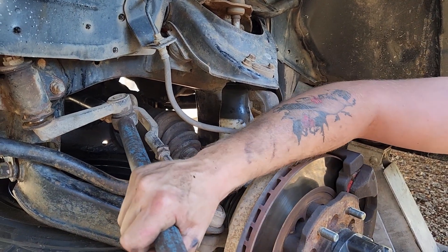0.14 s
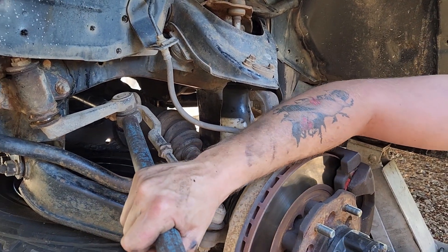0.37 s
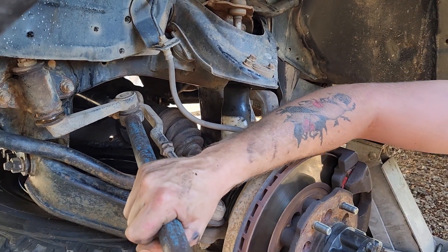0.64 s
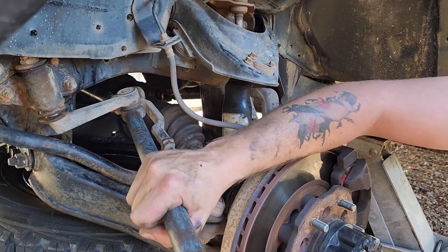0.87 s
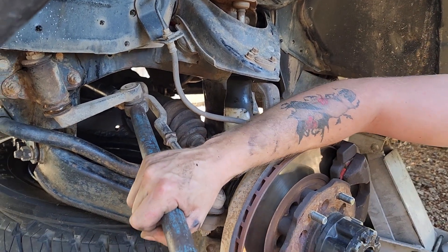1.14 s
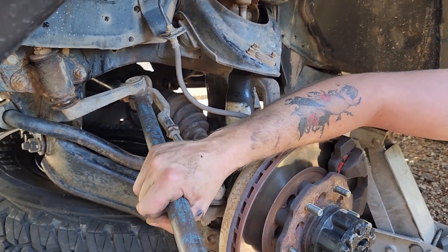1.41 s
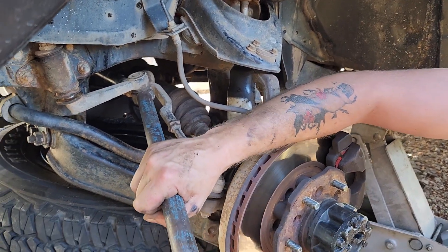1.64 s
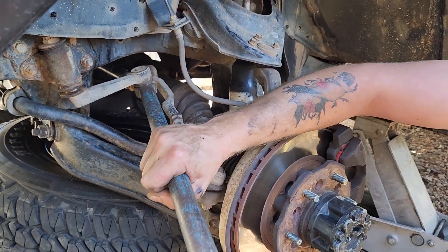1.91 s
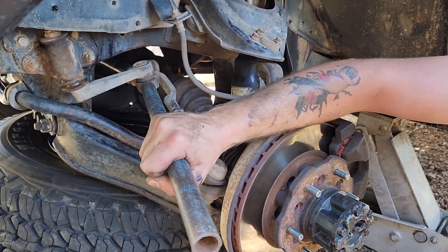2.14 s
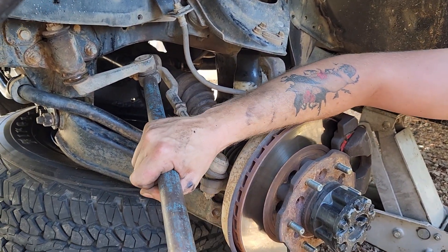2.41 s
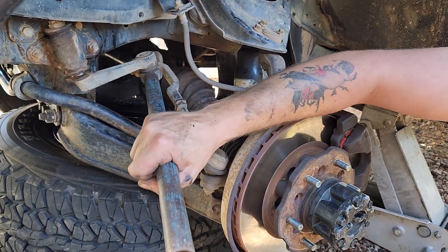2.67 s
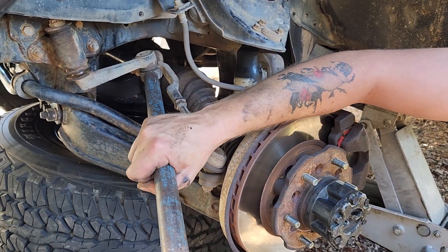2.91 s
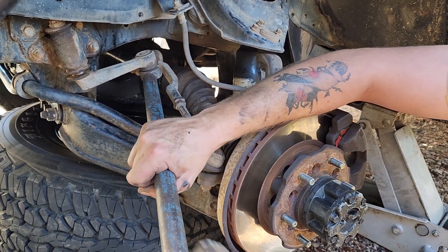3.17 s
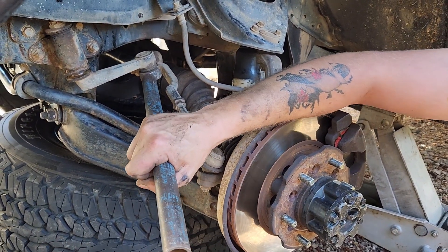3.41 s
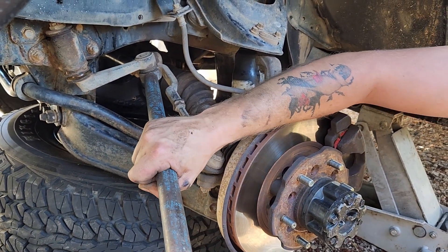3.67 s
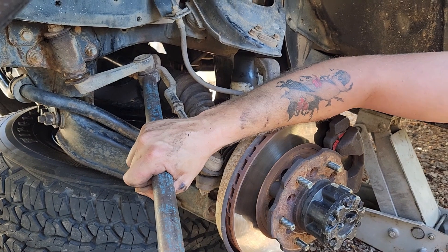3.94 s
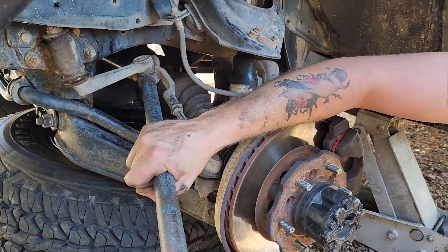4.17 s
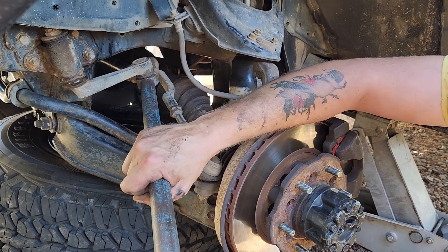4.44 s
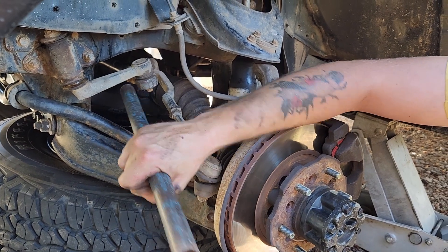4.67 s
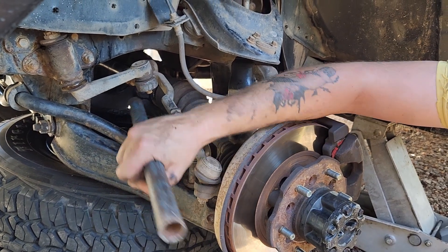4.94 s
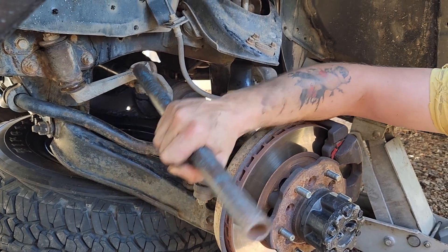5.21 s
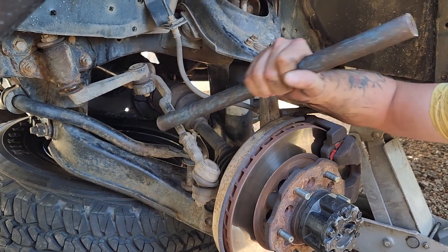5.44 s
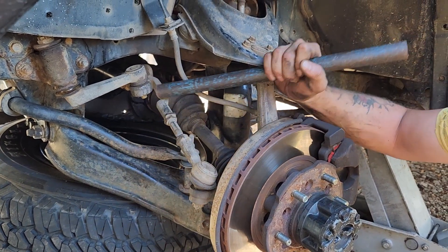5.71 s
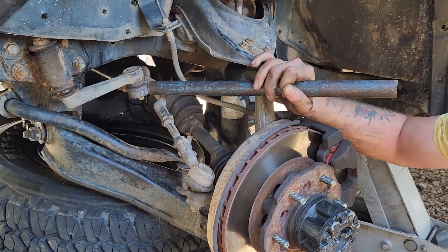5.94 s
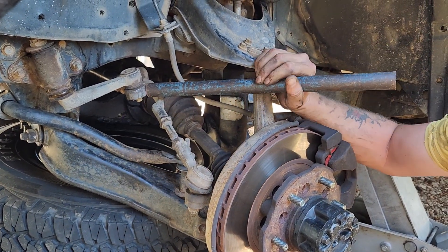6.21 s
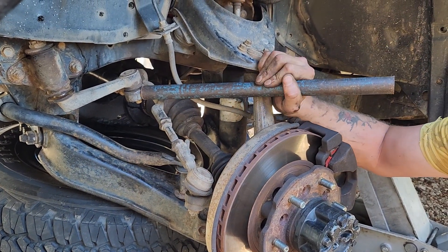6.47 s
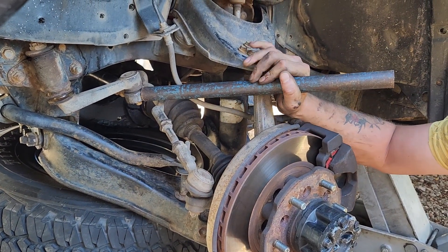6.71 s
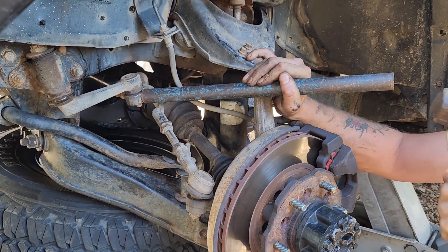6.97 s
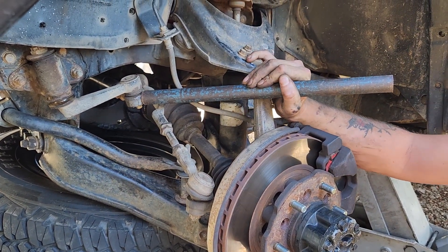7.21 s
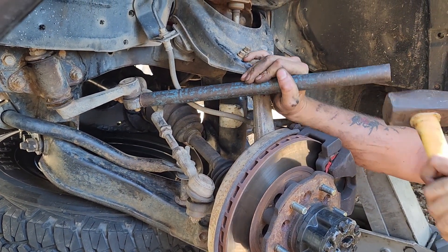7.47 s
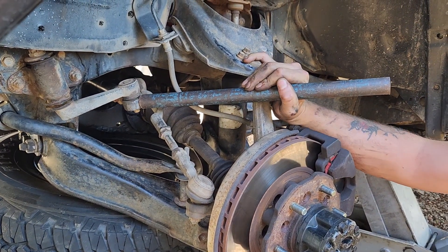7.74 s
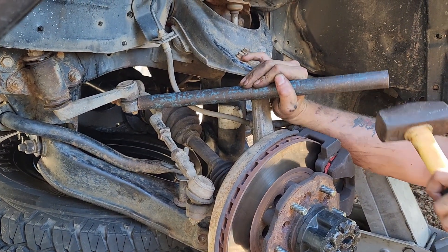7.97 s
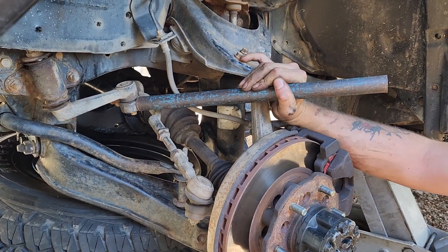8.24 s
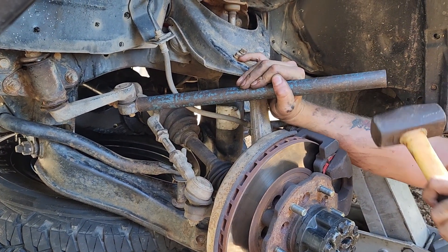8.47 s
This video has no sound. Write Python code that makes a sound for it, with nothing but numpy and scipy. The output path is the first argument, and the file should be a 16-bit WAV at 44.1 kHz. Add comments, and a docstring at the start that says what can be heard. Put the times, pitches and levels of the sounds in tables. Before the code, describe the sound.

A sledge hammer strikes a hand-held steel bar against a vehicle joint: three blows about half a second apart, a pause, five more, then a longer gap where the loose bar clinks and scrapes into place, and three final blows. Each is a short, damped clank with rattling bodywork and low boom. Close stereo microphone, slightly overloaded, outdoors with faint rumble and hiss.

```python
"""Far rumble, murmur and hiss fill the air; then a sledge hammer drives a hand-held steel bar against a vehicle's joint.
Each blow rings bar, hammer head and frame as dying modes, clatters through the bodywork as shaped noise
and leaves a low boom; soft limiting rounds off the loudest.
Between the runs the loose bar taps the joint with duller rings, dry noise bursts snap and grainy noise rubs like cloth."""
import sys
import numpy as np
from scipy import signal
from scipy.io import wavfile
from scipy.ndimage import uniform_filter1d, map_coordinates

SR = 44100
rng = np.random.default_rng(int(sys.argv[2]) if len(sys.argv) > 2 else 0)


def wav_out(sig):
    """Save sig, one row per channel (or a flat mono array), as 16-bit PCM at SR to the path in sys.argv[1]."""
    wavfile.write(sys.argv[1], SR, np.round(np.clip(np.atleast_2d(sig).T, -1, 1) * 32767).astype(np.int16))


def invert_db(x):
    """Field ratio 10**(x/20) for x, a level in decibels (scalar or array-like)."""
    u = np.asarray(x, float) / 20
    return 10 ** u


N = 379701

# hammer blows: [t/s, level/dB, thud/dB, brightness/dB, lower frame ring/dB, upper frame ring/dB], all relative levels
BLOW_EVENTS = [(0.536, -8, -5, 1, -16.5, 17), (1.026, -10, -4.5, 0, 1.5, 4),
               (1.525, -10, 3, -2.5, -4, -1.5), (2.764, -9.5, 1.5, 1.5, -4, 3),
               (3.263, -10, 1.5, -3.5, -9, -2), (3.816, -13, 2, 5, -15, -5),
               (4.294, -10.5, -2.5, 0, -1.5, -1.5), (4.786, -10, 3, -1, 2.5, -0.5),
               (7.604, -9.5, 3, 1, -4.5, 2.5), (8.093, -9, 2, -0.5, -0.5, 4), (8.591, -7, -1, 0, 15, 8.5)]
# pitches of the steel bar's modes: [f/Hz]
BAR_PITCHES = [400, 711, 802, 828, 856, 936, 1240, 1262, 1340, 1523, 1664, 1735, 1870, 2168, 2450, 3000,
               3550, 4090, 4170, 4300, 4720, 5755, 6400, 7400]
# the bar damped by the hand, one row a pitch: [level/dB before family offsets, t60/s in the firm grip]
BAR_RINGS = [(-10.5, 0.17), (-11, .1), (-9, .1), (3, 0.14), (-2.5, 0.17), (-4.5, 0.21), (-8.5, 0.06),
             (-1, 0.22), (2, 0.09), (-6.5, 0.07), (-1, 0.14), (-1, 0.087), (-4.5, 0.085), (0, 0.11),
             (-12, 0.06), (-14, .08), (-9, 0.031), (-5, .075), (-7, .055), (-4, .06), (-15, 0.054),
             (-15.5, 0.031), (-10, 0.18), (-16, 0.13)]
# centres of the bar's mode families: [f/Hz]
BAR_FAMILIES = [840, 1300, 1700, 2170, 4100, 4300, 5700]
# which bar families make the ping: [0 or 1]
PING_FAMILIES = np.array([0, 0, 0, 0, 1, 1, 0])
# pitches of the vehicle frame and axle: [f/Hz]
FRAME_PITCHES = [90, 119, 152, 200, 223, 268, 279, 296, 418, 434, 462, 479, 549, 617, 630, 640, 848, 1231,
                 1769, 2068]
# frame and axle, one row a pitch: [level/dB before family offsets, t60/s, rise/s]
FRAME_RINGS = [(-27, 1.2, .04), (-24, .7, .05), (-32, .9, .04), (-35, .7, .03), (-35, .8, .03),
               (-19, .6, .07), (-16, .5, .09), (-26, .2, .01), (-35, .7, .02), (-38, .6, .02),
               (-36, 1.1, .08), (-39, .8, .02), (-40, 1.1, .02), (-43, 1.2, .02), (-44, 1.2, .02),
               (-45, 1.2, .02), (-52, .9, .02), (-56, 1.4, .02), (-54, 2.2, .02), (-52, .75, .02)]
# centres of the frame's mode families: [f/Hz]
FRAME_FAMILIES = [110, 275, 463, 549, 625, 1769, 2068]
# stereo lean of sounds from the bar: [f/Hz, left minus right/dB]
STEREO_LEAN = [(60, -1), (240, -0.5), (950, -1.5), (3770, -4), (9500, -0.5), (15000, 3.5)]
# spectrum of the low rumble: [f/Hz, relative level/dB per Hz]
RUMBLE_SPECTRUM = [(12, -38.5), (20, -11), (65, 4), (124, -5.5), (155, -6.5), (242, -24.5), (274, -14),
                   (300, -23.5), (390, -56), (660, -120)]
# spectrum of the mid murmur: [f/Hz, relative level/dB per Hz]
MURMUR_SPECTRUM = [(88, -27), (150, 2.5), (371, -6), (498, -16.5), (616, -14.5), (646, -13.5), (1010, -21),
                   (2500, -36), (3250, -70), (5500, -120)]


def unit(x):
    """Scaled to rms 1."""
    return x / np.sqrt(np.mean(x ** 2) + 1e-20)


def along(points, hz):
    """Every column after the first, read on a log frequency axis."""
    f, *cols = np.transpose(points)
    return np.array([np.interp(np.log(hz + 1), np.log(f + 1), c) for c in cols])


def curves(rows):
    """One value per sample for each column after the time."""
    s, *cols = np.transpose(rows)
    return [np.interp(np.arange(N) / SR, s, c) for c in cols]


def wobble(rate):
    """A smooth random curve, rate knots a second."""
    knots = rng.standard_normal(int(N * rate / SR) + 4)
    return map_coordinates(knots, [np.arange(N) * rate / SR])


def add(mix, s, sound):
    """Lays a stereo sound into the mix at s seconds."""
    start = round(s * SR)
    mix[:, start:start + sound.shape[1]] += sound


def rush(spectrum, patchy_db):
    """Stereo noise of rms 1, patchy in time and pitch, its channels less alike towards the treble."""
    # left-right likeness: [f/Hz, correlation 0-1]
    likeness = [(40, .9), (130, .85), (300, .6), (700, .5), (1500, .25), (3000, .05)]
    hz, _, z = signal.stft(rng.standard_normal((2, N)), SR, nperseg=2048)
    field = uniform_filter1d(rng.standard_normal(z.shape[1:]), size=12, axis=0)
    field = uniform_filter1d(field, size=3, axis=1)
    turn = np.arccos(np.clip(along(likeness, hz)[0], -1, 1))[:, None] / 2
    mid, side = z * invert_db(along(spectrum, hz).T + patchy_db * unit(field))
    left = np.cos(turn) * mid + np.sin(turn) * side
    right = np.cos(turn) * mid - np.sin(turn) * side
    return unit(signal.istft(np.array([left, right]), SR, nperseg=2048)[1][:, :N])


def air():
    """Far rumble that swells in lumps, a mid murmur with thin tones, and hiss."""
    # background over time: [t/s, rumble/dB, murmur/dB, hiss/dB, tone offset/dB]
    bed_levels = [(0.0, -45.5, -55.5, -71.5, -1), (0.33, -46.5, -57, -73.5, 1),
                  (1.25, -53.5, -51.5, -73, 2.5), (2.61, -48.5, -65.5, -82.5, -5),
                  (3.04, -50, -55.5, -73.5, -6.5), (4.1, -50, -57, -78, -2.5), (4.91, -48, -55, -77.5, 0),
                  (5.42, -50, -63.5, -83, -7), (7.6, -45.5, -56.5, -68.5, 4.5), (7.82, -48, -53, -75, 3.5),
                  (8.61, -51.5, -57.5, -78, -2)]
    # spectrum of the hiss: [f/Hz, relative level/dB per Hz]
    hiss_spectrum = [(880, -23.5), (1500, -3.5), (1740, -2), (2160, -3), (4120, -3.5), (5490, -4),
                     (6180, -8.5), (8240, -5.5), (16000, -24.5)]
    # thin far tones: [f/Hz, rms level/dB before the tone offset]
    thin_tones = [(608.3, -74), (990.5, -80.5)]
    rumble_db, murmur_db, hiss_db, tones_db = curves(bed_levels)
    rumble = invert_db(rumble_db + 1.6 * wobble(4.1)) * rush(RUMBLE_SPECTRUM, patchy_db=1.5)
    murmur = invert_db(murmur_db) * rush(MURMUR_SPECTRUM, patchy_db=1.3)
    hiss = invert_db(hiss_db) * rush(hiss_spectrum, patchy_db=1.2)
    tones = np.zeros(N)
    for hz, db in thin_tones:
        sine = np.sqrt(2) * np.sin(2 * np.pi * hz * np.arange(N) / SR)
        tones += invert_db(db + tones_db + 0.5 * wobble(6.5)) * sine
    return rumble + murmur + tones + hiss


def ring(hz, db, t60, rise, scatter_db, apart, length, waver):
    """Dying modes at scattered strengths, up to apart seconds (at most a cycle) out of step between the channels.
    Rubbing contact makes phase (waver rad each 10 ms) and size wander."""
    t = np.arange(round(length * SR)) / SR
    size = invert_db(db + scatter_db * rng.standard_normal(len(hz)))
    step, swell = waver * rng.standard_normal((2, len(hz), 120))
    # real part: log size; imaginary part: phase, starting at zero
    knots = .5 * swell + 1j * (np.cumsum(step, axis=1) - step[:, :1])
    drift = np.array([np.interp(t, np.arange(len(k)) / 100, k) for k in knots])
    decay = np.outer(2j * np.pi * hz - np.log(1000) / t60, t)
    wave = np.exp((decay + drift).astype(np.complex64))
    wave *= 1 - np.exp(-t / np.reshape(rise, (-1, 1)))
    lead = np.clip(2 * np.pi * hz * apart, 0, 2 * np.pi) * rng.uniform(-.5, .5, len(hz))
    lean_db = along(STEREO_LEAN, hz)[0] / 2
    channels = []
    for ear in (1, -1):  # left, right
        weight = size * invert_db(ear * lean_db) * np.exp(1j * ear * lead)
        channels.append((weight @ wave).imag)
    return np.array(channels)


def clatter(low_db, high_db, stretch, alike_hz, length):
    """A crack, then noise that drops fast and trails off in the bodywork's hollows; channels agree below alike_hz."""
    # spectrum of the loose parts: [f/Hz, relative level/dB per Hz]
    parts_spectrum = [(59, -46.5), (100, -18.5), (847, -12.5), (1070, -15), (1300, -8.5), (2310, -14),
                      (4120, -12.5), (7020, -22), (9880, -15), (15100, -23), (16500, -42)]
    # how the clatter dies: [f/Hz, first t60/s before stretch, tail t60/s, tail level/dB]
    die_away = [(99, 0.4, .9, 1), (300, 0.3, 0.26, -2.5), (800, 0.13, 0.29, -4.5), (1900, 0.17, .4, -16.5),
                (3280, 0.14, 0.31, -19), (5600, 0.09, 0.34, -21), (12000, 0.062, 0.34, -27.5)]
    hz, t, z = signal.stft(rng.standard_normal((3, round(length * SR))), SR, nperseg=256)
    share = 1 / (1 + (hz[:, None] / alike_hz) ** 2)
    z = np.sqrt(share) * z[0] + np.sqrt(1 - share) * z[1:]
    first, tail, tail_db = along(die_away, hz)[..., None]
    swell = 1 - np.exp(-t * hz[:, None] / 12)  # the tail swells in over about a dozen cycles, so the lows bloom late
    crack = invert_db(6 - 60 * t / .025)  # t60 25 ms
    fade = crack + invert_db(-60 * t / (first * stretch)) + invert_db(tail_db - 60 * t / tail) * swell
    tilt_db = along([(700, low_db), (1800, 0), (5000, high_db)], hz).T
    lean_db = np.array([[[.5]], [[-.5]]]) * along(STEREO_LEAN, hz).T
    shaped = z * fade * invert_db(along(parts_spectrum, hz).T + tilt_db + lean_db)
    sound = signal.istft(shaped, SR, nperseg=256)[1]
    return sound * (1 - np.exp(-np.arange(sound.shape[1]) / SR / 0.0024))


def struck(hz, modes, family_hz, family_db):
    """The columns of a mode table, with levels raised or lowered along the family centres."""
    db, *rest = np.transpose(modes)
    offset_db = along(list(zip(family_hz, family_db)), np.array(hz))[0]
    return np.array(hz), db + offset_db, *rest


def hammer():
    """Every blow rings bar, hammer head and frame together and shakes the loose parts."""
    # pitches of the hammer head: [f/Hz]
    head_pitches = [4085, 6270, 9540, 9838, 9987, 10298, 11430, 11600, 11700, 12460, 13800, 14790]
    # hammer head, one row a pitch: [level/dB, t60/s]
    head_rings = [(-38, 0.68), (-36, 0.52), (-12, 0.02), (-8, 0.17), (-11.5, 0.23), (-13.5, 0.18),
                  (-17.5, 0.21), (-35.5, 0.28), (-17, .08), (-9, 0.046), (-17, 0.05), (-18.5, .08)]
    # bar held upright: [level/dB] for each bar family
    upright_bar = [-4, -1, 4.66, 1.5, 9, 1.8, -1]
    # bar laid level: [level/dB] for each bar family
    level_bar = [2, 0, 1.6, -6, -2, -1, -2]
    # frame under the upright bar: [level/dB] for the five lower frame families
    upright_frame = [-2.2, 1, 0.31, -2, -4.2]
    # frame under the level bar: [level/dB] for the five lower frame families
    level_frame = [1.5, 0.5, 5.5, 8, 3]
    levelled_s = 6  # blows from here on strike the bar laid level
    head_neutral_db, treble_neutral_db = -6, 3.5  # hammer head and clatter treble at zero brightness
    ping_follows, treble_follows = 2.2, 0.23  # dB per dB of brightness
    hum_follows = 1  # lowest frame family, dB per dB of thud
    mix = np.zeros((2, N + 2 * SR))
    for s, db, thud_db, bright_db, *rings_db in BLOW_EVENTS:
        bar_db, hum_db = (upright_bar, upright_frame) if s < levelled_s else (level_bar, level_frame)
        bar_db = bar_db + ping_follows * bright_db * PING_FAMILIES
        hum_db = hum_db + hum_follows * thud_db * (np.array(FRAME_FAMILIES[:5]) < 200)
        frame_db = [*hum_db, *rings_db]
        treble_db = treble_neutral_db + treble_follows * bright_db
        bar = ring(*struck(BAR_PITCHES, BAR_RINGS, BAR_FAMILIES, bar_db), rise=0.0013,
                   scatter_db=-0.5, apart=.0005, length=.25, waver=1.0)
        head = ring(np.array(head_pitches), *np.transpose(head_rings), rise=.0005,
                    scatter_db=2.5, apart=.0008, length=.35, waver=.9)
        frame = ring(*struck(FRAME_PITCHES, FRAME_RINGS, FRAME_FAMILIES, frame_db),
                     scatter_db=2.0, apart=0.0002, length=.85, waver=.08)
        loose_parts = clatter(thud_db, treble_db, stretch=0.8, alike_hz=577, length=.7)
        add(mix, s, invert_db(db - 10.5) * bar)
        add(mix, s, invert_db(db + head_neutral_db + bright_db) * head)
        add(mix, s, invert_db(db) * frame)
        add(mix, s, invert_db(db + 12.0) * loose_parts)
    return mix[:, :N]


def boom():
    """The bodywork swells into a low, uneven boom just after each blow."""
    peak_s, low_db, mid_db = 0.1, -38, -38  # time to the peak, levels relative to the blow
    boom_follows = .6  # dB per dB of thud
    swell = np.zeros(N)
    for s, db, thud_db, *_ in BLOW_EVENTS:
        u = np.clip(np.arange(N) / SR - s, 0, None) / peak_s
        swell += invert_db(db + boom_follows * thud_db) * (u * np.exp(1 - u)) ** 2
    low = invert_db(low_db) * rush(RUMBLE_SPECTRUM, patchy_db=1.5)
    mid = invert_db(mid_db + 2.0 * wobble(40)) * rush(MURMUR_SPECTRUM, patchy_db=0.5)
    return swell * (low + mid)


def taps():
    """Light touches of the loose bar on the joint favour modes near one pitch and shake frame and loose parts."""
    # touches: [t/s, relative level/dB, favoured f/Hz, clatter treble/dB, ping/dB, left minus right/dB]
    touches = [(2.169, -30, 2300, -6, -15.5, 1), (4.828, -35, 2176, -4.5, 15, 1),
               (5.619, -28.5, 1494, -8, 6.5, -1), (5.647, -32, 1865, -4.5, 20, -2.5),
               (5.747, -44.5, 1720, -8.5, -10, -5.5), (5.877, -40, 1380, -19, 2, -2.5),
               (5.971, -50, 1250, -31, -2, -5.0), (6.048, -26, 856, -19.5, 5.5, -1),
               (6.114, -37.5, 1440, -23, -1, -4), (6.437, -29, 1490, -10, 0, 5),
               (6.449, -22.5, 1170, -12.5, 14.5, -4), (6.613, -35.5, 900, -11.5, 15, -2),
               (7.281, -52.5, 840, -18, 0, -8.5)]
    # the loosely held bar: [level/dB] for each bar family
    loose_levels = [-3, -3, -5.5, -2, -2.5, 1.5, -2]
    # ring length of the loose bar: [factor, before the overall one] for each bar family
    loose_lengths = [1.05, 0.91, 1.35, 0.55, 1.72, 0.92, 1.1]
    # how a tap shakes the frame: [level/dB] for each frame family
    frame_shake = [-2.5, -0.5, 13.5, -7.5, 1, 11, 1.5]
    favoured_db, below_db_per_oct, above_db_per_oct = 11, 17, 12  # peak and slopes around the favoured pitch
    firm_db, dulling = -24.5, .55  # taps softer than this gain clatter bass, firmer ones lose it (dB per dB)
    loose = 0.83  # overall length factor of bar ring and first clatter decay
    mix = np.zeros((2, N + SR))
    for s, db, favoured_hz, high_db, ping_db, pan_db in touches:
        family_db = loose_levels + ping_db * PING_FAMILIES
        hz, mode_db, t60 = struck(BAR_PITCHES, BAR_RINGS, BAR_FAMILIES, family_db)
        octaves = np.log2(hz / favoured_hz)
        slope_db = np.maximum(above_db_per_oct * octaves, -below_db_per_oct * octaves)
        mode_db = mode_db + favoured_db - slope_db
        t60 = t60 * loose * along(list(zip(BAR_FAMILIES, loose_lengths)), hz)[0]
        bar = ring(hz, mode_db, t60, rise=0.00031, scatter_db=5.0, apart=.0001, length=.3, waver=0.6)
        frame = ring(*struck(FRAME_PITCHES, FRAME_RINGS, FRAME_FAMILIES, frame_shake),
                     scatter_db=1.5, apart=.0003, length=.4, waver=.12)
        frame = frame * np.linspace(1, 0, round(.4 * SR))
        low_db = dulling * (firm_db - db)
        loose_parts = clatter(low_db, high_db, stretch=0.76 * loose, alike_hz=3000, length=0.92)
        gain = invert_db(db + np.array([[pan_db], [-pan_db]]) / 2)
        add(mix, s, gain * invert_db(-15) * bar)
        add(mix, s, gain * frame)
        add(mix, s, gain * invert_db(7.5) * loose_parts)
    return mix[:, :N]


def snaps():
    """Short dry bursts of noise around a centre pitch: grit and cloth snap, and at 3.69 s the bar gives one
    sharp click."""
    # bursts: [t/s, level/dB, centre f/Hz, t60/s]
    bursts = [(3.0024, -54, 2020, 0.025), (3.1339, -68, 1770, 0.033), (3.1716, -64, 1755, 0.023),
              (3.694, -33, 1640, 0.0098), (5.441, -70.5, 3540, 0.2), (7.005, -59, 1410, 0.027),
              (7.202, -45.5, 12780, 0.058), (7.3123, -48, 12000, 0.034)]
    mix = np.zeros((2, N + SR))
    t = np.arange(SR // 5) / SR
    for s, db, hz, t60 in bursts:
        edges = [hz * .6, min(hz * 1.7, SR * .45)]
        band = signal.butter(2, edges, "bandpass", fs=SR, output="sos")
        noise = unit(signal.sosfilt(band, rng.standard_normal((2, len(t)))))
        add(mix, s, invert_db(db - 60 * t / t60) * (1 - np.exp(-t / .0015)) * noise)
    return mix[:, :N]


def cloth():
    """Cloth rubs as the hammer arm is raised: a grainy noise rustle swelling and fading rub by rub."""
    # rubs: [t/s of the peak, level/dB, rise time constant/s, fall time constant/s]
    arm_rubs = [(7.11, -64, .03, .045), (7.21, -63, .006, .055), (7.314, -64, .005, .03),
                (7.507, -60, .01, .045)]
    # spectrum of the rustle: [f/Hz, relative level/dB per Hz]
    rub_spectrum = [(710, -16.5), (1200, 3), (1700, -1), (3220, -5), (7020, -7.5), (12500, -11),
                    (16000, -21.5)]
    t = np.arange(N) / SR
    envelope = np.zeros(N)
    for s, db, rise, fall in arm_rubs:
        envelope += invert_db(db) * np.exp(-np.maximum((s - t) / rise, (t - s) / fall))
    grain = invert_db(2.7 * wobble(130))
    return envelope * grain * rush(rub_spectrum, patchy_db=1.1)


def scene():
    """All sources summed in stereo."""
    return air() + hammer() + boom() + taps() + snaps() + cloth()


def roll_off(x):
    """The treble ends steeply here."""
    return signal.sosfilt(signal.butter(12, 16990, fs=SR, output="sos"), x)


def record(dry):
    """The overloaded input rounds off the blows just under full scale."""
    top, hardness = .92, 5  # ceiling of full scale 1, sharpness of the knee
    clipped = dry / (1 + np.abs(dry / top) ** hardness) ** (1 / hardness)
    return roll_off(clipped)


dry = scene()
out = record(dry)
wav_out(out)
```